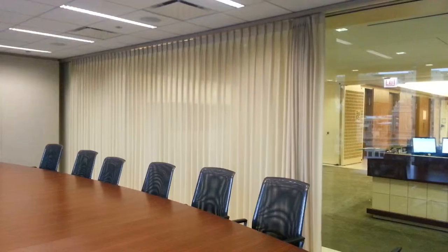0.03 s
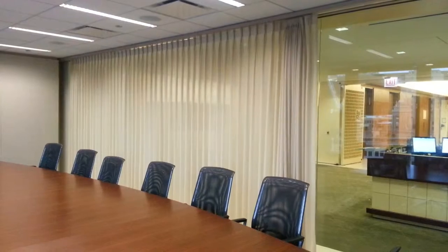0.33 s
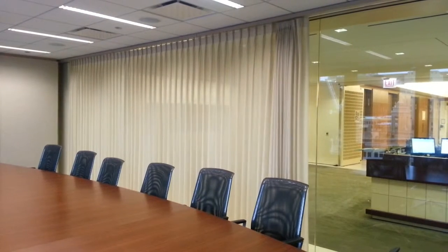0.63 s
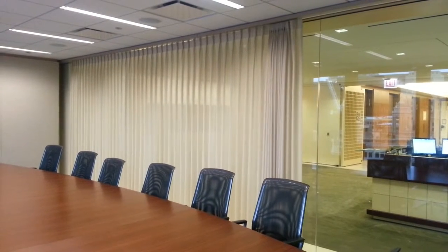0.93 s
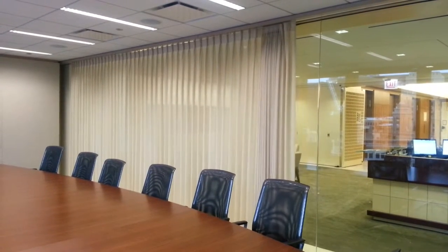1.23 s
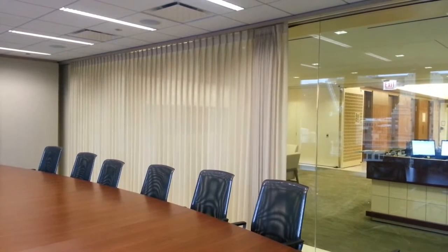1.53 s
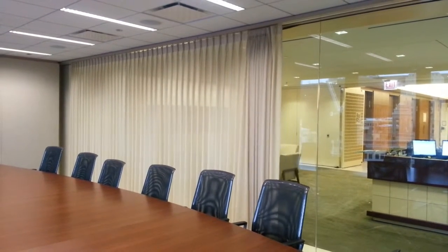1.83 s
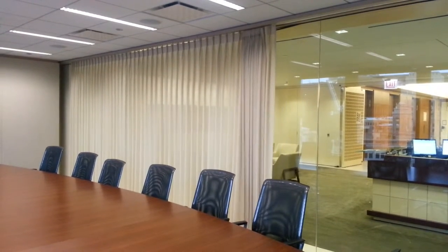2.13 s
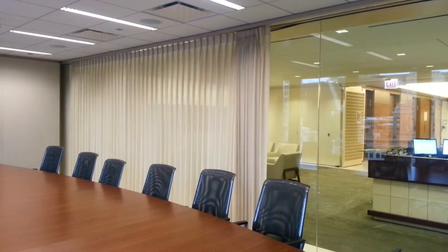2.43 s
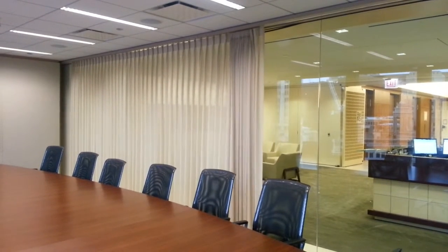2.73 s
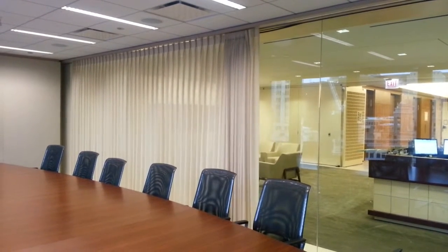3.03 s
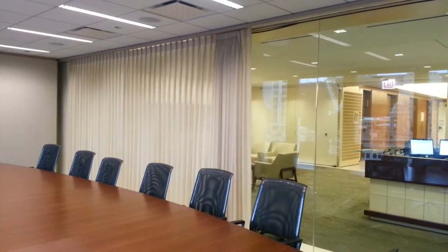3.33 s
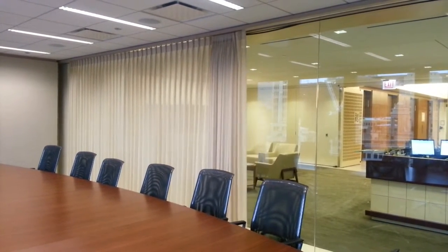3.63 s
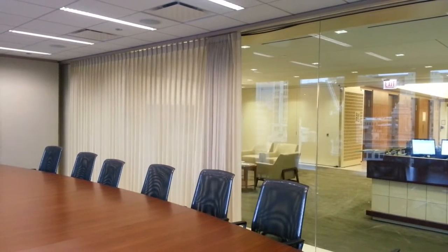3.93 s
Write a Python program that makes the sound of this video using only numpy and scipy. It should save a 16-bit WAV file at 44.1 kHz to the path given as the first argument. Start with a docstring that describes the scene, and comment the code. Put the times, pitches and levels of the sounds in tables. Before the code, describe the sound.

A motorized curtain glides along its track with a steady soft hiss.

```python
"""A steady hiss fades in out of silence: a motorized curtain glides along its track in a quiet meeting room.
Its carriers (the small sliders that hold the cloth) rub in the metal rail and keep it ringing with many
close tones, a little louder as they go. The motor drones faintly, the cloth swishes twice, and near the
end something bumps lightly with a short clack. Ventilation and a throbbing hum lie below."""
import sys
import numpy as np
from scipy import signal
from scipy.fft import rfft, irfft
from scipy.io import wavfile

SR = 44100
rng = np.random.default_rng(int(sys.argv[2]) if len(sys.argv) > 2 else 0)


def digitize_waveform(pressure):
    """Quantize a signal to 16-bit integers and store it at the path in sys.argv[1].

    Rows of a 2-D input are taken as channels; values are limited to [-1, 1].
    """
    field = np.atleast_2d(pressure).T
    bounded = np.clip(field, -1, 1)
    quanta = np.round(bounded * 32767).astype(np.int16)
    wavfile.write(sys.argv[1], SR, quanta)


N = 176400
TIME = np.arange(N) / SR
FREQS = np.maximum(np.arange(N // 2 + 1) * SR / N, 1)


def carriers():
    """The carriers slide in the track with a finely grained hiss; its treble dulls a little as they go."""
    # Tone colour of the hiss: f/Hz, left level/dB, right level/dB
    hiss_colour = [(650, -83.2, -83.2), (1000, -79.9, -81.9), (1350, -77.8, -81.4), (1680, -73.6, -76.0),
                   (1850, -69.9, -71.5), (2000, -69.1, -73.2), (2230, -68.5, -68.0), (2420, -69.8, -68.8),
                   (2650, -71.9, -67.0), (2800, -71.9, -67.5), (3000, -73.1, -71.5), (3250, -71.8, -68.5),
                   (3700, -75.9, -74.6), (4250, -77.9, -75.8), (4550, -73.8, -72.0), (4850, -75.6, -74.1),
                   (5300, -72.9, -71.2), (5650, -74.6, -72.9), (6000, -76.1, -71.8), (6500, -81.0, -71.1),
                   (7000, -83.7, -70.2), (7250, -85, -67.4), (7550, -84.7, -67.8), (8000, -85.2, -69.8),
                   (8600, -87.7, -74.8), (10000, -92.1, -77.6), (11500, -94.0, -83.6),
                   (13000, -103.7, -88.8), (14000, -113.3, -102.1)]
    # How much louder or softer the rubbing gets: t/s, level/dB
    rubbing = [(.4, -0.3), (.8, -0.15), (1.05, -0.75), (1.8, -0.85), (2.15, 0), (2.7, 0), (3.3, -0.2),
               (4, 0.4)]
    low_cut_hz, treble_hz = 636, 8160
    colour = from_db(at_hz(hiss_colour, FREQS)) * room_ripple(depth_db=1, spacing_hz=30)
    colour /= np.sqrt(1 + (low_cut_hz / FREQS) ** 10)
    hiss = flickering(stereo_noise() * colour, depth_db=.5, rate=14)
    treble = irfft(rfft(hiss) / (1 + (treble_hz / FREQS) ** 10), N)
    treble_db = 1.7 - .48 * TIME
    hiss = hiss + treble * (from_db(treble_db) - 1)
    rubbing_db = np.interp(TIME, *np.transpose(rubbing)) - .87
    grain_db = .6 * drift(rate=160)
    return hiss * from_db(rubbing_db + grain_db)


def rail():
    """Rubbing rings the rail's walls and its modes: the ways it can bend, each with a tone of its own."""
    # How hard the rail is rung: t/s, level/dB
    ringing = [(.4, -4), (.8, -2.5), (1.1, -3.5), (1.8, -1.5), (2.2, -2), (2.5, -0.3), (2.8, 1.3),
               (3.3, 1.6), (4, 1)]
    # Strength of the bending modes: f/Hz, left level/dB, right level/dB
    mode_levels = [(3700, -84, -82), (3950, -76, -69), (4140, -81, -73), (4430, -81, -71), (4735, -69, -70),
                   (4840, -72, -71), (4941, -70.5, -65), (5046, -70.5, -63.3), (5152, -66.3, -60),
                   (5259, -65, -61.5), (5366, -61.8, -61.3), (5475, -64, -62), (5585, -68.5, -65.5),
                   (5695, -67, -69.5), (5807, -68, -67.3), (5920, -70, -69), (6033, -70.5, -66),
                   (6263, -75, -72), (6380, -78, -66.5), (6497, -86, -77), (6615, -79, -69),
                   (6735, -87, -76), (6855, -81, -67), (7223, -90, -65.5), (7347, -89, -67.5),
                   (7472, -88, -64.8), (7600, -84, -62), (7726, -90, -64.5), (7983, -92, -70.5)]
    # Broad, quickly dying rings of the walls: f/Hz, width/Hz, level/dB, dB gained per dB of ringing
    wall_rings = [(2620, 280, -73.5, 1), (4470, 320, -85, 4)]
    centre_hz, spacing_hz, stretch_hz = 5259, 107.2, .49
    ringing_db = np.interp(TIME, *np.transpose(ringing))
    friction, modes = irfft(stereo_noise(), N), 0
    for k in range(-18, 25):
        hz = centre_hz + spacing_hz * k + stretch_hz * k * k  # higher modes lie further apart
        swell = from_db(.3 * drift(rate=12))
        strength = from_db(at_hz(mode_levels, hz))[:, None]
        modes = modes + resonance(friction, hz, width_hz=13) * swell * strength
    scraping = irfft(stereo_noise(), N)
    walls = sum(resonance(scraping, hz, width) * from_db(db + follows * ringing_db)
                for hz, width, db, follows in wall_rings)
    return modes * from_db(1.24 + ringing_db) + walls


def drive():
    """The motor shakes its housing, which drones; its tone, just under the hum's main one, beats with it."""
    # Dull resonances of the housing: f/Hz, width/Hz, left level/dB, right level/dB
    housing_rings = [(170.7, 14.2, -67, -72), (192.6, 11.4, -71, -77), (249.5, 19, -74.5, -76),
                     (390, 3.6, -70, -78.5), (520, 10.4, -84, -75), (791, 35, -81.5, -81),
                     (948, 30, -83.5, -78), (1795, 21, -74.5, -67), (1895, 10, -69.5, -65),
                     (2206, 120, -68, -70)]
    motor_hz, motor_db = 114.5, -61
    shaking = irfft(stereo_noise(), N)
    phase = 2 * np.pi * (motor_hz * TIME + rng.random()) + .6 * drift(rate=1.83)
    motor = np.sqrt(2) * np.sin(phase) * from_db(motor_db)
    housing = sum(resonance(shaking, hz, width) * from_db([[left], [right]])
                  for hz, width, left, right in housing_rings)
    return housing + motor


def cloth():
    """The moving cloth gives two soft swishes."""
    # Swishes: t/s, half length/s, level/dB, f/Hz, width/octaves
    swishes = [(2.5, 0.061, -75, 1370, 0.67), (3.67, 0.039, -75, 350, 0.76)]
    return noise_bursts(swishes)


def scuffs_and_clack():
    """Three brief scuffs of the carriers, then the short bright clack of the light knock."""
    # Three scuffs and, in the last row, the clack: t/s, half length/s, level/dB, f/Hz, width/octaves
    bright_bursts = [(.86, 0.063, -85, 7500, 0.13), (2.43, 0.012, -71, 7700, 0.21),
                     (2.49, 0.025, -67.5, 4470, 0.11), (3.828, 0.016, -64.5, 2500, 0.3)]
    return noise_bursts(bright_bursts)


def bump():
    """A light knock rings a few resonances, smeared by the room; the lowest lasts longest."""
    # What the knock rings: f/Hz, width/Hz, level/dB, time to fall by 60 dB (t60/s)
    knock_rings = [(377, 190, -69.5, 0.75), (610, 200, -73, 0.36), (830, 80, -72, 0.68),
                   (975, 23, -67, 0.44), (1330, 270, -75, .4)]
    start_s, rise_s = 3.826, .006
    since = np.maximum(TIME - start_s, 0)
    push = irfft(stereo_noise(), N) * np.minimum(since / rise_s, 1)
    return sum(resonance(push * from_db(db - 60 * since / fall_s), hz, width)
               for hz, width, db, fall_s in knock_rings)


def ventilation():
    """Air moves through the room with a low rush."""
    # Tone colour of the rush: f/Hz, left level/dB, right level/dB
    air_colour = [(20, -92.0, -95), (40, -77, -83), (60, -74.5, -76), (93, -72.5, -74), (177, -71, -67.5),
                  (253, -70, -74.5), (448, -77.5, -76.5), (640, -75.5, -92)]
    high_cut_hz = 572
    colour = from_db(at_hz(air_colour, FREQS) - 2.1) * room_ripple(depth_db=1, spacing_hz=7.9)
    colour /= np.sqrt(1 + (FREQS / high_cut_hz) ** 10)
    return flickering(stereo_noise() * colour, depth_db=.5, rate=10)


def hum():
    """The mains electricity hums with a low tone and its overtones, each throbbing on its own."""
    # One row for each multiple of the mains frequency: level/dB, left minus right/dB, throb/dB
    hum_tones = [(-74, -3, 1), (-52, -1, 1.8), (-54.5, 0.5, 2.5), (-61, 2, 0.5), (-66.5, -4, -1.5),
                 (-75, 2, 2.5)]
    mains_hz, multiples = 60, (1, 2, 4, 6, 8, 10)
    out = 0
    for multiple, (db, pan_db, throb_db) in zip(multiples, hum_tones):
        phase = 2 * np.pi * (multiple * mains_hz * TIME + rng.random()) + .22 * drift(rate=9)
        tone = np.sqrt(2) * np.sin(phase) * from_db(db + throb_db * drift(rate=9))
        out = out + tone * from_db([[pan_db / 2], [-pan_db / 2]])
    return out


def noise_bursts(rows):
    """Each burst is a band of noise that swells and dies away."""
    noise, out = stereo_noise(), 0
    for peak_s, half_s, db, hz, octaves in rows:
        band = np.exp(-.5 * (np.log2(FREQS / hz) / octaves) ** 2)
        swell = np.exp(-.5 * ((TIME - peak_s) / half_s) ** 2)
        out = out + irfft(noise * band, N) * from_db(db) * swell
    return out


def resonance(x, hz, width_hz):
    """Ringing at one pitch: sound at `hz` passes at full strength, the rest is weakened."""
    r = np.exp(-np.pi * width_hz / SR)
    feedback = [1, -2 * r * np.cos(2 * np.pi * hz / SR), r * r]
    return signal.lfilter(np.array([1, 0, -1]) * (1 - r * r) / 2, feedback, x)


def stereo_noise():
    """Spectrum of even noise at 0 dB per Hz, as alike in both ears as the room leaves it."""
    # How alike left and right are: f/Hz, likeness (1 the same, 0 unrelated, below 0 opposed)
    likeness = [(30, 0.7), (90, 0.85), (210, 1), (320, 0.77), (490, 0.64), (740, 0.42), (1120, 0.002),
                (1710, -0.077), (2600, -0.099), (3950, 0.18), (5300, 0.6), (7000, 0.15), (9000, -0.17)]
    mid, side = rfft(rng.standard_normal((2, N))) * np.sqrt(SR) / 2
    alike = at_hz(likeness, FREQS)[0]
    return np.sqrt(1 + alike) * mid + np.sqrt(1 - alike) * side * [[1], [-1]]


def room_ripple(depth_db, spacing_hz):
    """Echoes make some frequencies a little louder and others softer, differently at each ear."""
    ripples = [drift(SR * SR / N / spacing_hz, size=len(FREQS)) for _ in range(2)]
    return from_db(depth_db * np.array(ripples))


def flickering(spectrum, depth_db, rate):
    """Turns a spectrum into sound whose octave bands each waver in level on their own."""
    octave, out = np.clip(np.log2(FREQS / 50), 0, 8), 0
    for k in range(9):
        band = np.maximum(1 - abs(octave - k), 0)
        out = out + irfft(spectrum * band, N) * from_db(depth_db * drift(rate))
    return out


def drift(rate, size=N):
    """A random wander, typically of size 1, that turns about `rate` times a second."""
    points = rng.standard_normal(4096)
    return np.interp(np.arange(size) * rate / SR, np.arange(len(points)), points) / np.sqrt(2 / 3)


def at_hz(table, hz):
    """Looks up a table's columns at `hz`, blending between rows on a pitch scale."""
    row_hz, *columns = np.transpose(table)
    return np.array([np.interp(np.log(hz), np.log(row_hz), column) for column in columns])


def from_db(db):
    """Turns decibels into a factor to multiply by."""
    return 10 ** (np.asarray(db) / 20)


def scene():
    """The moving curtain over the room's background."""
    curtain = carriers() + rail() + drive() + cloth() + scuffs_and_clack() + bump()
    return curtain + ventilation() + hum()


def record(dry):
    """The sound fades in from silence, and the highest treble is cut away."""
    fade_start_s, fade_length_s, cutoff_hz = .381, .29, 13700
    fade = np.clip((TIME - fade_start_s) / fade_length_s, 0, 1) ** .91
    treble_cut = signal.ellip(10, .1, 80, cutoff_hz, fs=SR, output="sos")
    return signal.sosfilt(treble_cut, dry * fade)


dry = scene()
out = record(dry)
digitize_waveform(out)
```